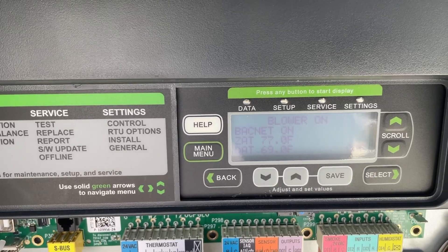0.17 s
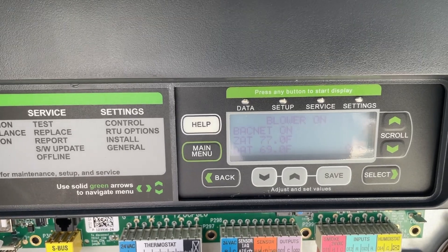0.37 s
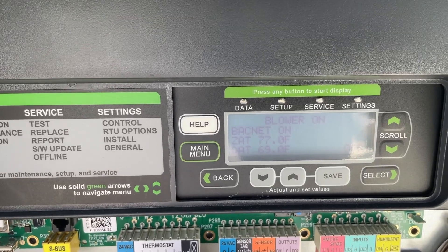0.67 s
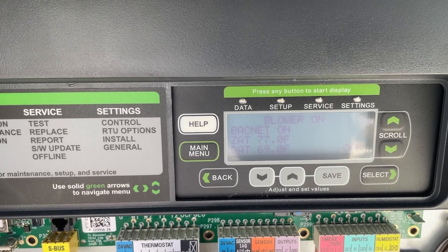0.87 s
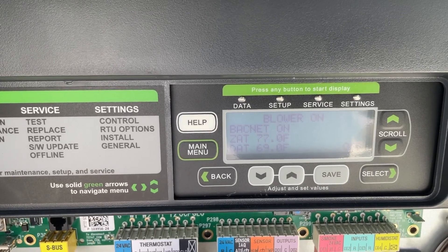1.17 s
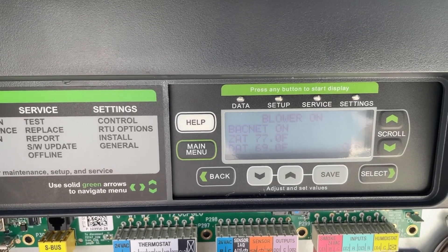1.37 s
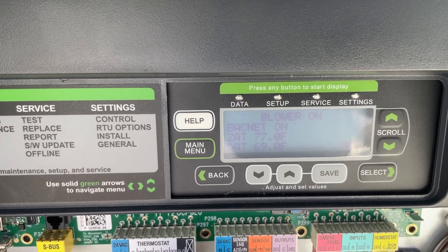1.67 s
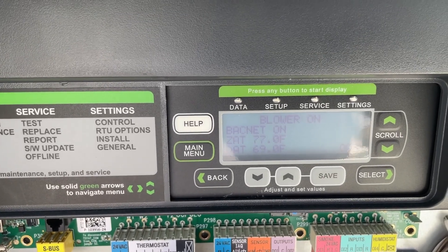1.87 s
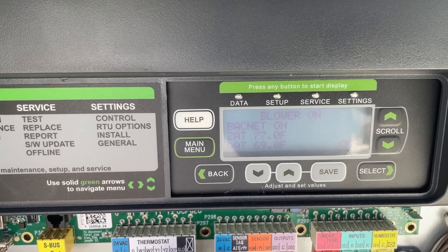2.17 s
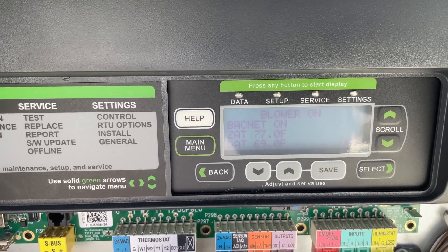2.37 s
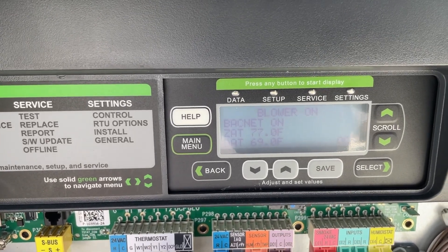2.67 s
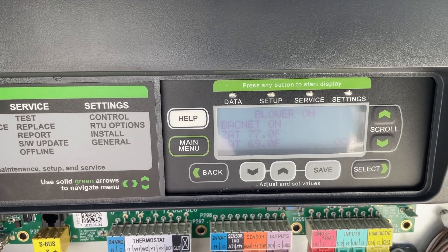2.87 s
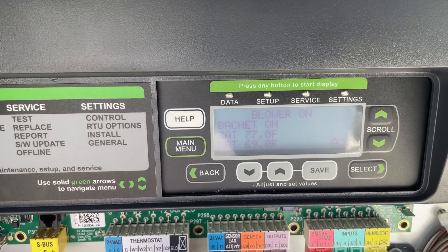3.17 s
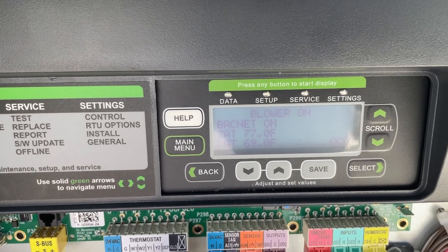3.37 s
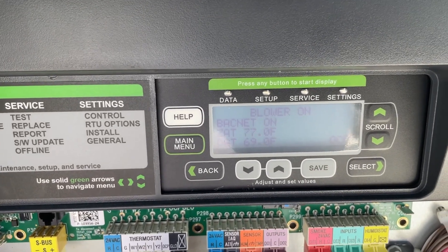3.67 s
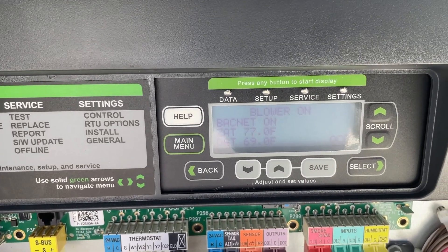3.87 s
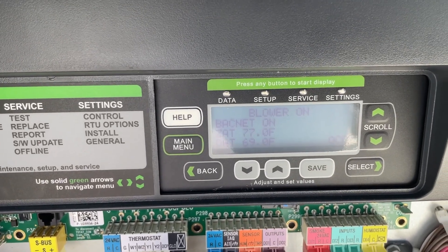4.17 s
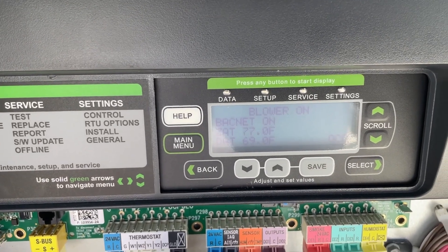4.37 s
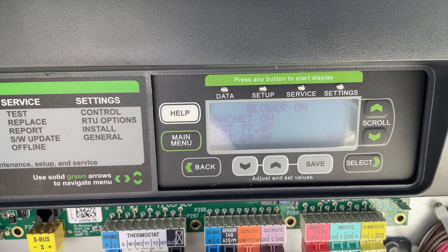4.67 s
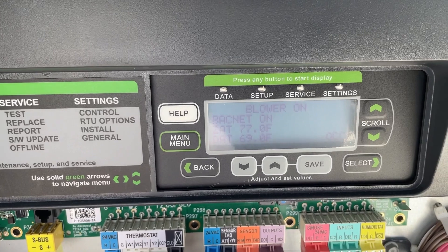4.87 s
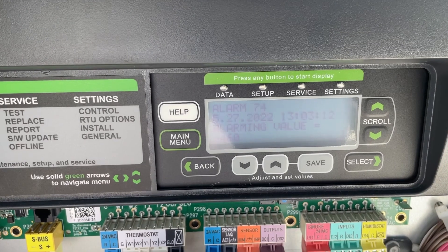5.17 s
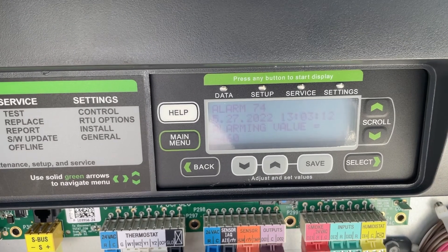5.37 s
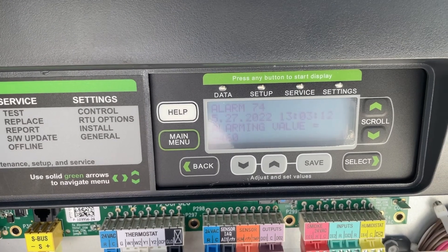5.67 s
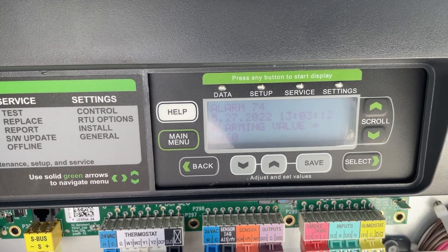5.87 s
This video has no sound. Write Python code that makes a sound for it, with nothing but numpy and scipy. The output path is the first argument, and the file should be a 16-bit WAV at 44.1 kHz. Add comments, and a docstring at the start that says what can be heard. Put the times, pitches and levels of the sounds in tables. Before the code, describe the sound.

Continuous machine noise from a large outdoor air conditioner heard up close: even low hum, faint belt drone, dull airflow rushing through sheet metal, and a thin steady whine with a gentle flutter. Slightly after four seconds come two tiny crisp clicks, the second much weaker. The airflow differs a little left to right, as with a phone's two spaced microphones. The unit simply keeps running.

```python
"""Open rooftop air conditioner

Heard from beside its control box: steady mains hum, the thin slot whine of the blower motor with its beats, a
faint drone of the drive belt, a small tick and a fainter one. Hum, whine and drone are gently wandering sines.
Air rushing through the cabinet is patchy noise, coloured differently on each side by the panels; the ticks are
short ringing modes with a soft puff of treble around their start. A phone with two spaced microphones."""
import sys
import numpy as np
from scipy import signal
from scipy.fft import rfft, irfft, next_fast_len
from scipy.io import wavfile
from scipy.ndimage import uniform_filter1d, map_coordinates

SR = 44100
rng = np.random.default_rng(int(sys.argv[2]) if len(sys.argv) > 2 else 0)


def store_pcm(level_fs):
    """Save levels as 16-bit WAV."""
    pcm = np.round(np.clip(level_fs, -1, 1) * 32767).astype(np.int16)
    wavfile.write(sys.argv[1], SR, np.atleast_2d(pcm).T)


N = 265702

MAINS_HZ, ROTOR_HZ = 59.96, 29.453
SLOTS = 36  # rotor slots, each passing once a turn
WHEEL_HZ, BELT_HZ = 11.63, 4.447  # turns a second of the blower wheel and the drive belt


def amp(db):
    """Decibels to gain."""
    return 10 ** (np.asarray(db) / 20)


def unit(x):
    """Scaled to rms 1."""
    return x / np.sqrt(np.mean(x ** 2) + 1e-20)


def wobble(rate, count):
    """Smooth random curves through random knots, rate knots a second."""
    knots = rng.standard_normal((count, int(N * rate / SR) + 4))
    coarse = np.arange(0, N + 64, 64)  # the spline is read every 64 samples, with straight lines between
    curves = [map_coordinates(k, [coarse * rate / SR]) for k in knots]
    return np.array([np.interp(np.arange(N), coarse, curve) for curve in curves])


def filtered(x, response):
    """x shaped by a complex response of frequency."""
    m = next_fast_len(N + SR // 2)
    spectrum = rfft(x, m) * response(np.fft.rfftfreq(m, 1 / SR))
    return irfft(spectrum, m)[..., :N]


def tones(hz, arrival, waver_db, drift, rate):
    """Sines with (left/dB, right/dB, left lead/rad) rows; level and phase (drift, rad) wander a little."""
    left_db, right_db, lead = np.transpose(arrival)[..., None]
    turns = np.outer(hz, np.arange(N) / SR) + rng.random(lead.shape)
    phase = 2 * np.pi * turns + drift * wobble(rate, count=len(hz))
    size = np.sqrt(2) * amp(waver_db * wobble(rate, count=len(hz)))
    left = size * amp(left_db) * np.sin(phase + lead)
    right = size * amp(right_db) * np.sin(phase)
    return np.array([left.sum(axis=0), right.sum(axis=0)])


def motor():
    """Mains and slot forces shake the motor frame at sums of their rates; wheel and belt load it once a turn."""
    # magnetic tones at a x slot whine + b x mains + c x rotor turns:
    # a, b, c, left level/dB, right level/dB, left lead/rad
    magnetic = np.array([(0, 0, 1, -59, -59, 0), (0, 1, 0, -44, -42, 0), (0, 2, 0, -29.2, -29.8, 0),
                         (0, 4, 0, -49, -56, -.5), (0, 6, 0, -43.5, -38.2, -.15), (0, 12, 0, -55, -52, -.8),
                         (1, -6, 0, -58, -52, -.75), (1, -2, 0, -54, -62, 0), (1, 0, 1, -53.5, -62, 1.4),
                         (1, 2, 0, -55.5, -59, 1.25), (2, 0, 0, -70, -79, 3)])
    # the slot whine itself: left level/dB, right level/dB, left lead/rad
    whine = (-36.8, -35.2, 1.68)
    # the uneven load spreads the whine by a x wheel turns + b x belt turns: a, b, level re whine/dB
    sidebands = [(-1, 0, -19), (1, 0, -17), (2, 0, -14), (0, -2, -22), (0, -1, -22), (0, 2, -24)]

    slot_hz = SLOTS * ROTOR_HZ
    hum_hz = magnetic[:, :3] @ [slot_hz, MAINS_HZ, ROTOR_HZ]
    hum = tones(hum_hz, magnetic[:, 3:], waver_db=1.1, drift=.12, rate=12)

    # the first row is the whine's own tone, a few hundredths of a hertz above the slot rate
    beats = np.array([(0.0021, 0.00077, 0.009)] + sidebands)
    whine_hz = slot_hz + beats[:, :2] @ [WHEEL_HZ, BELT_HZ]
    arrival = whine + np.outer(beats[:, 2], [1, 1, 0])
    return hum + tones(whine_hz, arrival, waver_db=.5, drift=.08, rate=2.5)


def patchy_noise(patchy_db):
    """Two unrelated noises, 0 dB per Hz, under one field of brief eddy-sized gain patches."""
    z = signal.stft(rng.standard_normal((2, N)), nperseg=512)[2]
    field = rng.standard_normal(z.shape[1:])
    field = uniform_filter1d(field, size=5, axis=0)  # blurred over frequency
    field = uniform_filter1d(field, size=8, axis=1)  # and over time
    field = field - uniform_filter1d(field, size=40, axis=1)  # only brief patches stay
    pair = signal.istft(z * amp(patchy_db * unit(field)), nperseg=512)[1][:, :N]
    return unit(pair) * np.sqrt(SR / 2)


def cabinet(hz):
    """The air noise's colour at each side: left dB, right dB, likeness and left lead at these frequencies."""
    # cabinet booming, air through the wheel, sheet-metal resonances and notches:
    # f/Hz, left level/dB per Hz, right level/dB per Hz, left-right likeness 0-1, left lead/rad
    body = [(22, -75.5, -75.5, 0.77, 0.0), (32, -64.0, -64.0, 0.97, -0.1), (45, -57.5, -57.0, 0.96, -0.1),
            (55, -52.0, -51.0, 0.97, -0.1), (68, -48.5, -47.5, 0.98, -0.1), (77, -50.5, -49.0, 0.97, -0.1),
            (100, -47.0, -45.5, 0.98, -0.1), (109, -49.0, -48.5, 0.94, 0.0), (128, -49.0, -49.0, 0.98, 0.0),
            (145, -45.0, -46.0, 0.97, 0.0), (170, -49.0, -50.0, 0.94, 0.1), (195, -51.0, -52.5, 0.87, 0.0),
            (225, -52.5, -56.0, 0.88, -0.1), (250, -56.0, -58.5, 0.76, 0.2), (285, -54.0, -58.0, 0.57, 0.2),
            (320, -58.0, -61.5, 0.48, 0.6), (345, -61.5, -60.0, 0.63, 0.4), (375, -60.5, -58.0, 0.53, 0.9),
            (410, -62.0, -63.5, 0.59, 0.4), (470, -64.0, -65.0, 0.5, 0.2), (540, -64.5, -66.5, 0.41, 1.8),
            (610, -67.5, -68.5, 0.32, 0.0), (665, -65.5, -66.5, 0.29, 0.9), (735, -67.5, -67.0, 0.44, 1.5),
            (765, -70.5, -72.5, 0.56, 1.9), (810, -69.5, -70.0, 0.53, 1.9), (840, -67.0, -68.0, 0.6, 1.2),
            (870, -69.0, -70.0, 0.66, 0.9), (910, -66.5, -68.5, 0.81, 0.8), (980, -66.0, -68.0, 0.82, 1.2),
            (1030, -66.0, -67.0, 0.74, 1.6), (1100, -66.5, -67.0, 0.77, 1.2),
            (1170, -62.5, -65.0, 0.89, 1.2), (1260, -64.5, -65.5, 0.81, 1.2),
            (1340, -65.0, -65.5, 0.81, 1.7), (1400, -62.0, -62.5, 0.88, 2.0),
            (1445, -64.0, -68.0, 0.62, 2.4), (1480, -63.5, -68.0, 0.55, 1.6),
            (1570, -64.5, -71.0, 0.71, 1.4), (1640, -67.5, -69.5, 0.74, 1.2),
            (1710, -68.0, -71.5, 0.6, 2.3), (1742, -70.0, -72.0, 0.45, 2.0),
            (1778, -78.0, -77.0, 0.07, 1.0), (1818, -68.5, -68.5, 0.85, -0.2),
            (1850, -67.5, -66.0, 0.95, -0.2), (1900, -72.5, -69.5, 0.93, -0.2),
            (1950, -79.0, -77.5, 0.82, -0.3), (2020, -82.5, -82.0, 0.57, -0.5),
            (2080, -80.5, -80.5, 0.6, -1.0), (2122, -74.5, -76.5, 0.58, -1.5),
            (2200, -77.5, -79.5, 0.46, 0.0), (2300, -80.0, -82.5, 0.64, 0.3),
            (2420, -79.0, -84.0, 0.4, -0.6), (2530, -80.0, -85.0, 0.43, 0.3),
            (2620, -83.5, -87.5, 0.38, 0.8), (2690, -81.0, -88.5, 0.45, 0.7),
            (2830, -85.0, -87.5, 0.6, 0.9), (2940, -81.5, -87.0, 0.59, 0.4),
            (3020, -82.5, -87.5, 0.62, 0.2), (3200, -86.5, -90.0, 0.48, 0.3),
            (3530, -88.5, -92.0, 0.43, 0.2)]
    # hiss, the left side lagging more as pitch rises: # f/Hz, left level/dB per Hz, right level/dB per Hz,
    # likeness 0-1
    hiss = [(4060, -90, -94.5, 0.9), (4670, -92, -93, 0.52), (5500, -92.5, -97, 0.8),
            (6300, -95.5, -95.5, 1), (7500, -96, -98, 0.7), (7600, -100.5, -100.5, 1),
            (9350, -100.2, -100.1, 1), (9950, -103, -103, 0.9), (11700, -106, -106, 1),
            (13400, -111.8, -111.7, .7), (14500, -111.4, -111.4, 1), (15600, -119, -119, .9)]
    in_step_hz, delay_s = 5210, 0.00016  # where both sides agree in phase; delay of the left side
    hiss_rows = [(f, *rest, 2 * np.pi * (in_step_hz - f) * delay_s) for f, *rest in hiss]
    f, *columns = np.transpose(body + hiss_rows)
    return [np.interp(np.log(hz + 1), np.log(f), c) for c in columns]


def air():
    """Turbulent flow: a part common to both sides, shifted in phase, and a part that only the right side adds."""
    # the flow surges separately in each range:
    # top of range f/Hz, depth/dB rms, knots of the surge curve per s, evens out within t/s
    surges = [(700, .4, 16, .2), (900, .9, 12, .5), (1760, 1.3, 19, .45), (1980, 1.7, 12, 1.5),
              (7000, .4, 14, .4), (22000, .9, 24, .4)]

    def under(hz, edge_hz):
        return 1 / (1 + (hz / edge_hz) ** 24)

    def arrive(hz):
        left_db, right_db, alike, lead = cabinet(hz)
        alike = np.clip(alike, 0, 1)
        left = amp(left_db) * np.exp(1j * lead)
        right_common = amp(right_db) * alike
        right_own = amp(right_db) * np.sqrt(1 - alike ** 2)
        return np.array([left, right_common, right_own])

    common, apart = patchy_noise(patchy_db=.6)
    out, low_hz = np.zeros((2, N)), 8
    for top_hz, depth_db, rate, even_s in surges:
        surge = wobble(rate, count=1)[0]
        surge = surge - uniform_filter1d(surge, size=round(even_s * SR))
        gain = unit(amp(depth_db * unit(surge)))
        share = lambda hz: (under(hz, top_hz) - under(hz, low_hz)) * arrive(hz)
        left, right, own = filtered(np.array([common, common, apart]), share)
        out += gain * np.array([left, right + own])
        low_hz = top_hz
    return out


def belt():
    """The belt's unevenness returns every turn and shakes the cabinet, arriving as the air noise does."""
    # multiples of the belt's turn that the cabinet passes best: multiple, level over the air noise per Hz/dB
    harmonics = [(14, 3), (21, 6), (22, 5), (26, 8), (31, 5), (32, 5), (40, 4), (41, 6), (42, 4), (46, 10),
                 (59, 4), (70, 3), (73, 3), (152, 4), (154, 10), (155, 5), (156, 6)]
    multiple, over_db = np.transpose(harmonics)
    hz = multiple * BELT_HZ
    left_db, right_db, _, lead = cabinet(hz)
    arrival = np.transpose([left_db + over_db, right_db + over_db, lead])
    return tones(hz, arrival, waver_db=2.0, drift=0.55, rate=1.5)


def tick():
    """Clicks: short ringing modes with a soft puff of treble around their start, phased as the air noise is."""
    # the two clicks: t/s, level before colouring/dB
    clicks = [(4.0925, -35), (4.297, -47)]
    # ringing modes: f/Hz, level before colouring/dB, free t60/s
    modes = [(4330, -4, .04), (4800, 1, .05), (5200, -7, .03), (5700, -1, .025), (6900, -11, .03),
             (7900, -11, .03), (8600, -11, .03), (9900, -2, .02)]
    rasp = .07  # phase wander that blurs the modes, rad per sample
    puff_offset_s = 0.0087  # offset of the treble puff from the ring
    ring_s, damped_t60_s = .006, .025  # the modes ring freely this long, then die away faster

    out, t = np.zeros((2, N + SR)), np.arange(SR // 20) / SR
    rise = 1 - np.exp(-t / 0.0015)
    damping = amp(-60 * np.maximum(t - ring_s, 0) / damped_t60_s)
    for s, db in clicks:
        ring = np.zeros(len(t))
        for hz, level, t60 in modes:
            wander = np.cumsum(rng.normal(0, rasp, len(t)))
            ring += amp(level - 60 * t / t60) * np.sin(2 * np.pi * hz * t + wander)
        ring = ring * damping

        noise = rng.standard_normal((3, len(t)))
        sides = 1.15 * noise[0] + .3 * noise[1:]  # mostly shared by both sides
        bright = np.diff(sides, prepend=0)  # differencing lifts the treble
        puff = amp(-6.5 - 60 * t / .09) * bright * (t < .016)

        ring_at, puff_at = round(s * SR), round((s - puff_offset_s) * SR)
        out[:, ring_at:ring_at + len(t)] += amp(db) * rise * ring * amp([[0], [-3]])  # right side 3 dB softer
        out[:, puff_at:puff_at + len(t)] += amp(db) * rise * puff

    def colour(hz):
        low_cut = (1j * hz / 3500 / (1 + 1j * hz / 3500)) ** 2
        return low_cut / (1 + 1j * hz / 10000) ** 2 / (1 + (hz / 13000) ** 6)

    def arrive(hz):
        return colour(hz) * np.exp(1j * np.outer([1, 0], cabinet(hz)[3]))  # the left side takes the lead

    return filtered(out[:, :N], arrive)


def scene():
    """Everything at the two microphones."""
    return motor() + belt() + air() + tick()


def record(dry):
    """The phone keeps nothing above its band limit."""
    top_hz = 15750
    return filtered(dry, lambda hz: hz < top_hz)


dry = scene()
out = record(dry)
store_pcm(out)
```